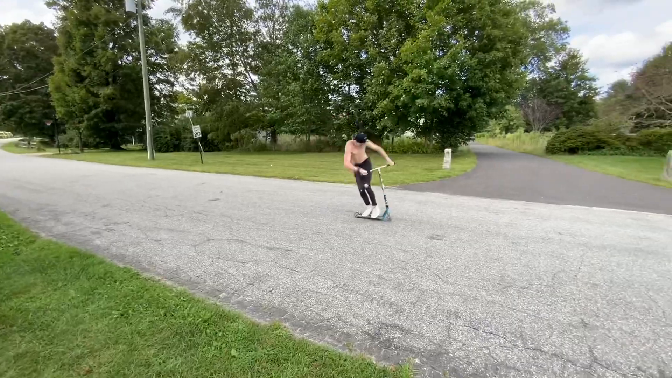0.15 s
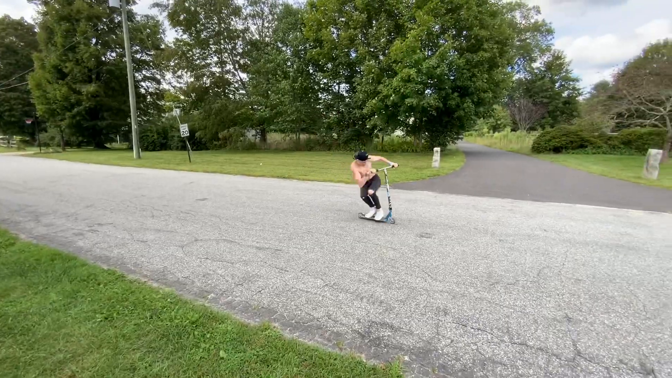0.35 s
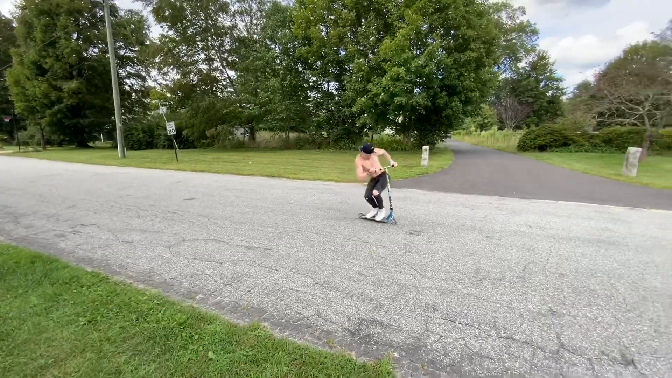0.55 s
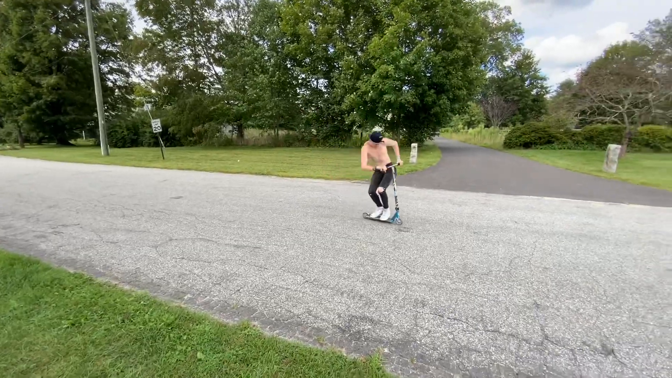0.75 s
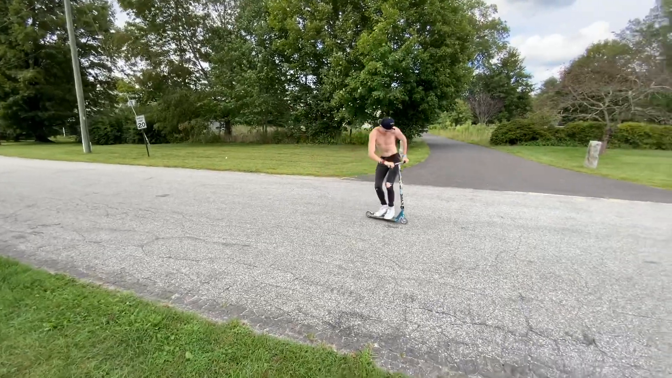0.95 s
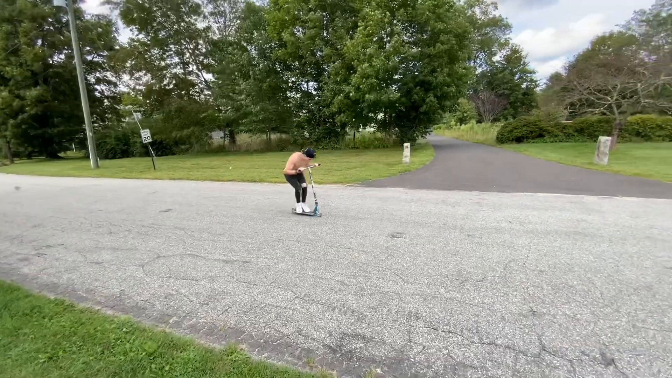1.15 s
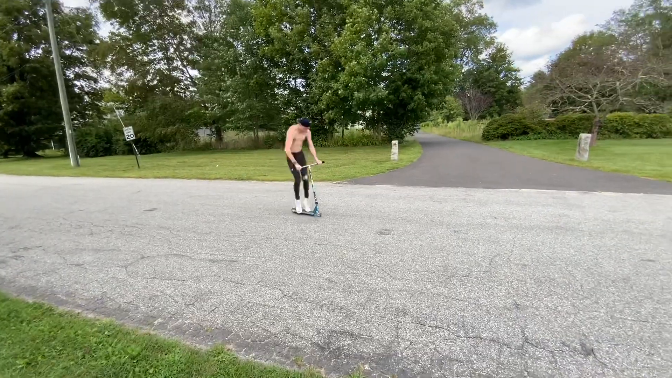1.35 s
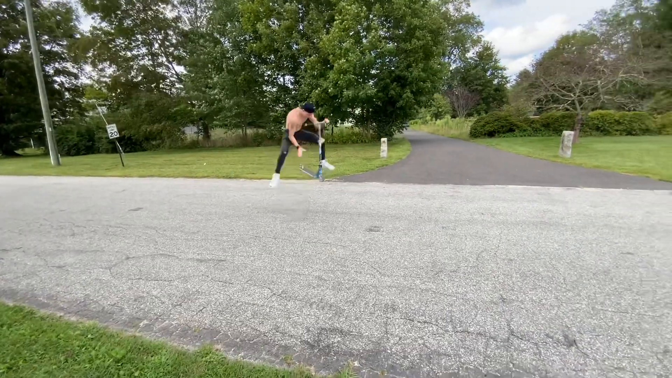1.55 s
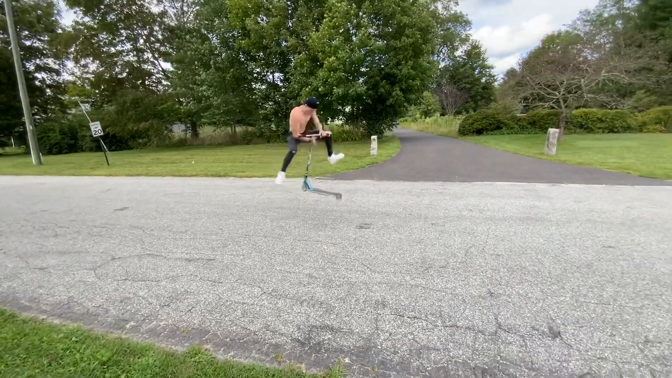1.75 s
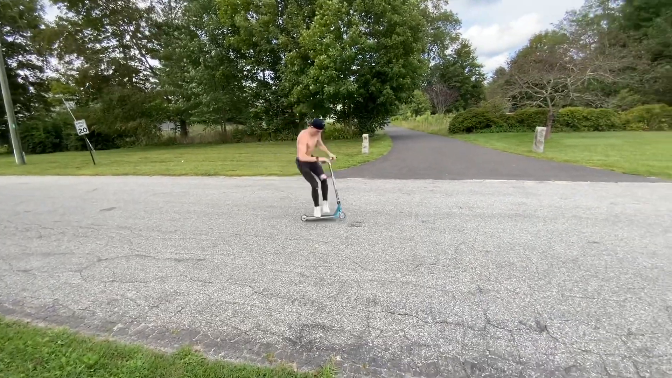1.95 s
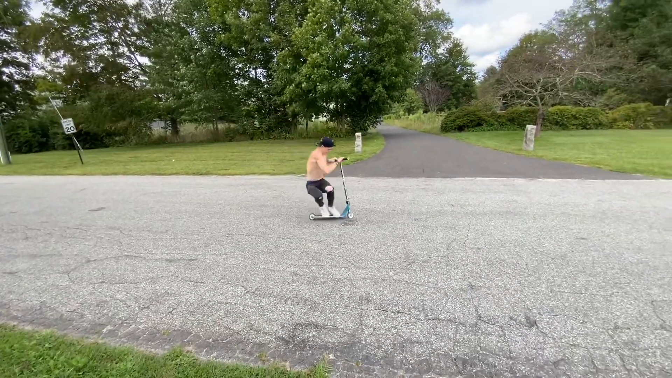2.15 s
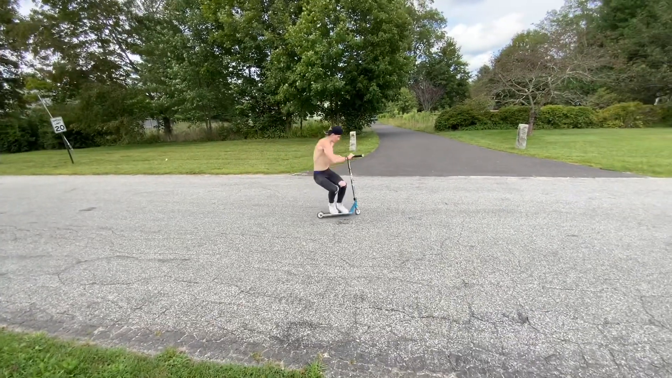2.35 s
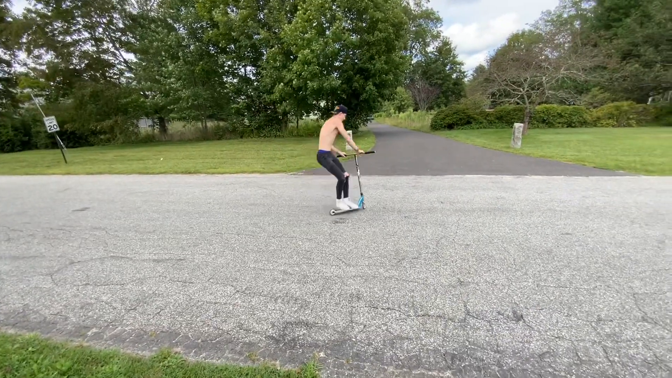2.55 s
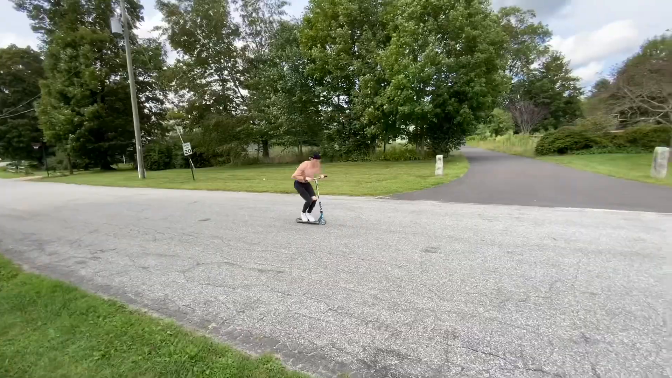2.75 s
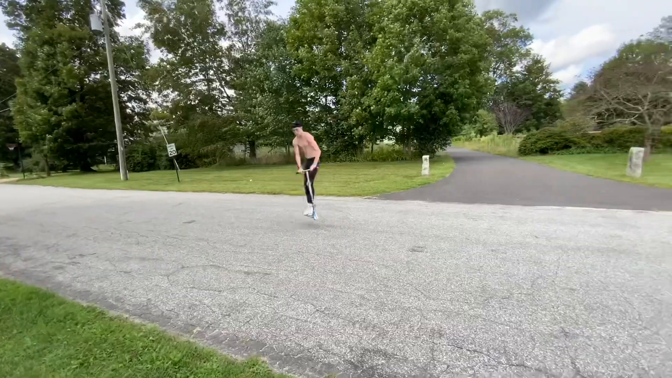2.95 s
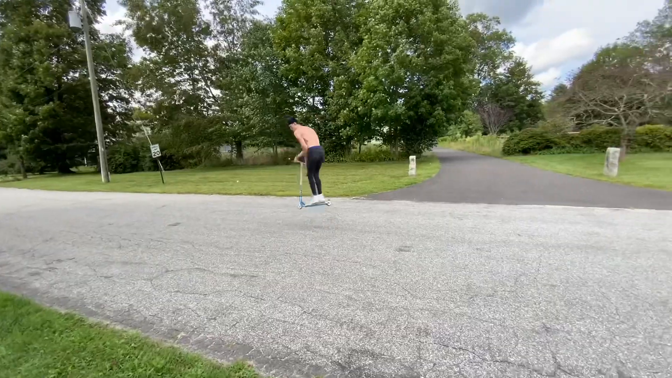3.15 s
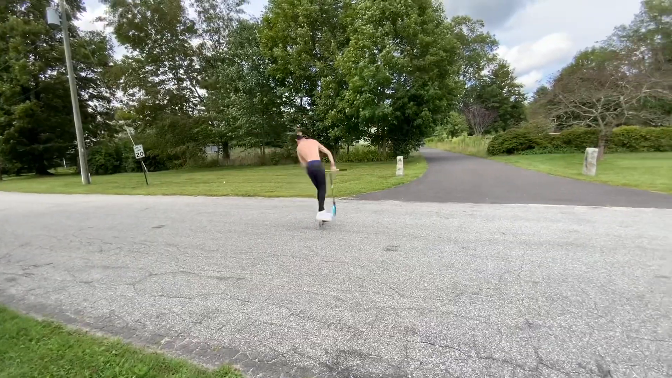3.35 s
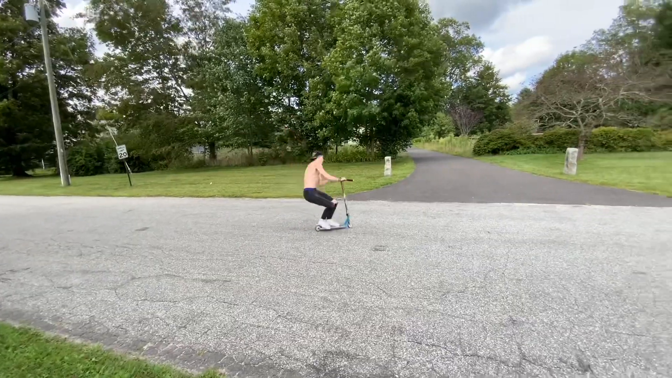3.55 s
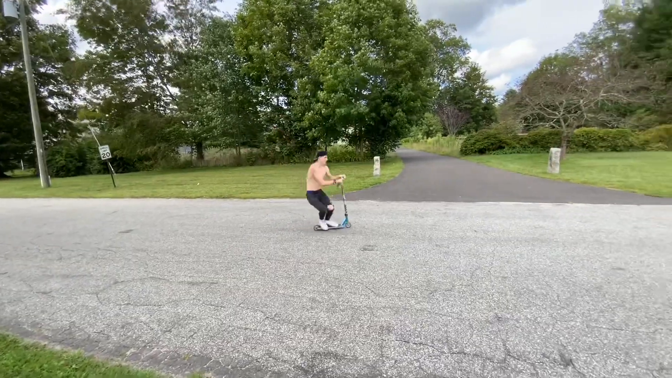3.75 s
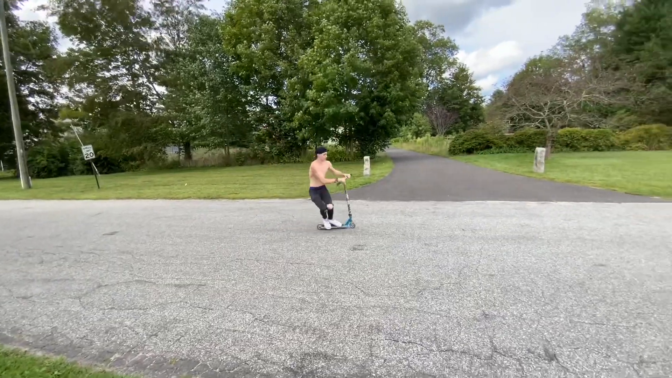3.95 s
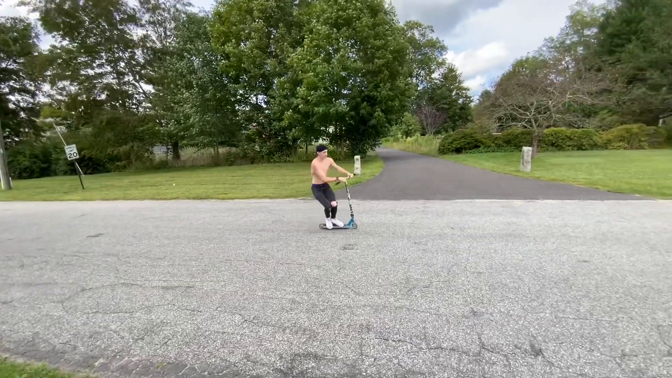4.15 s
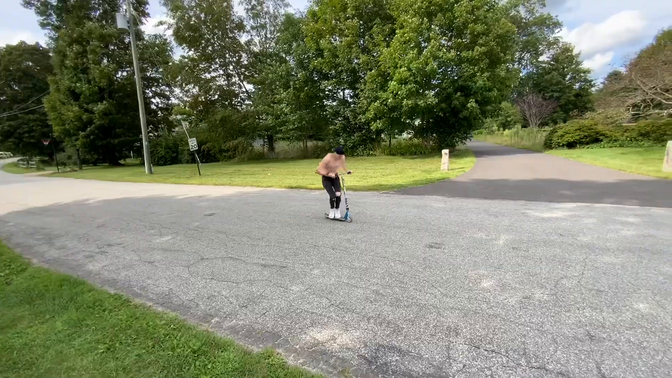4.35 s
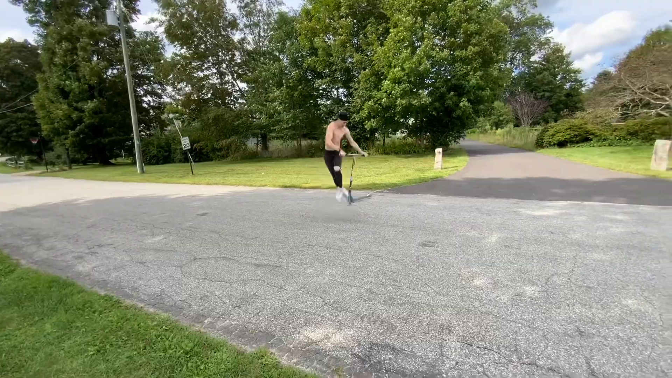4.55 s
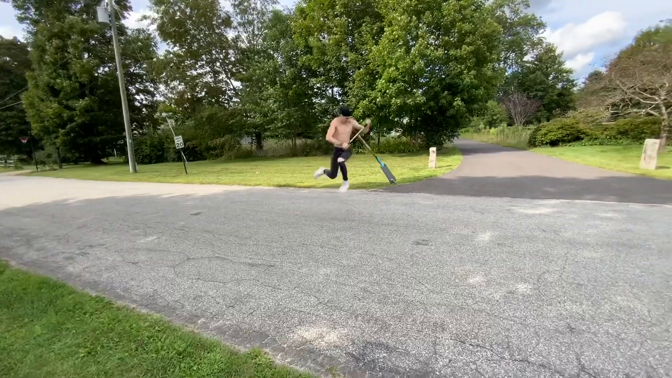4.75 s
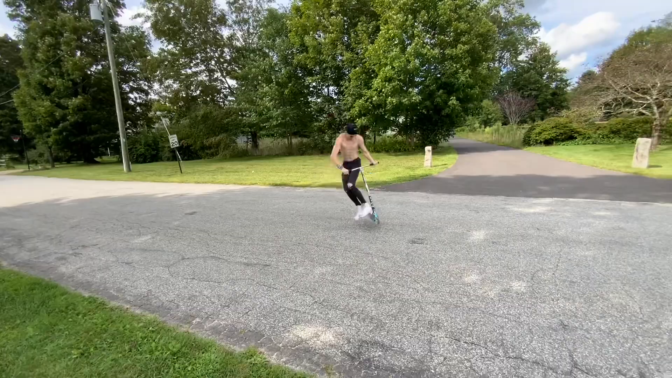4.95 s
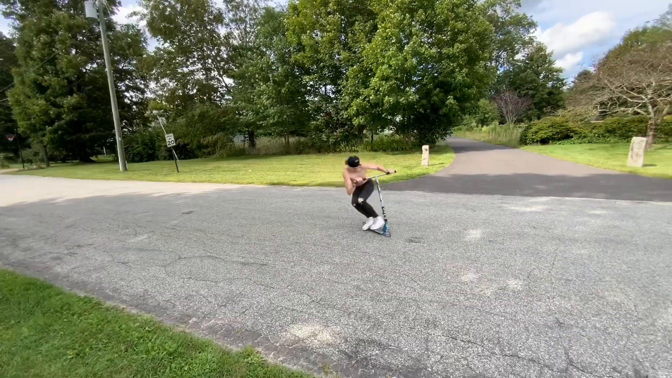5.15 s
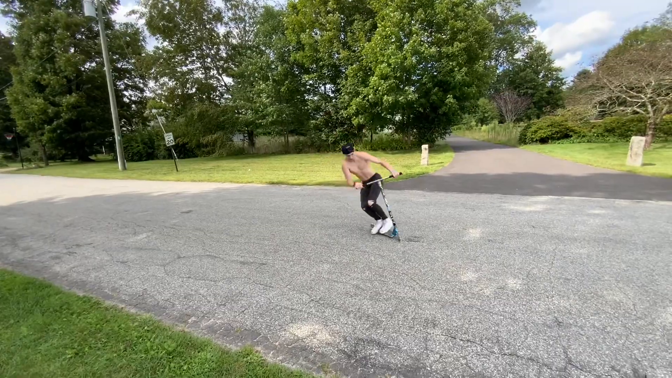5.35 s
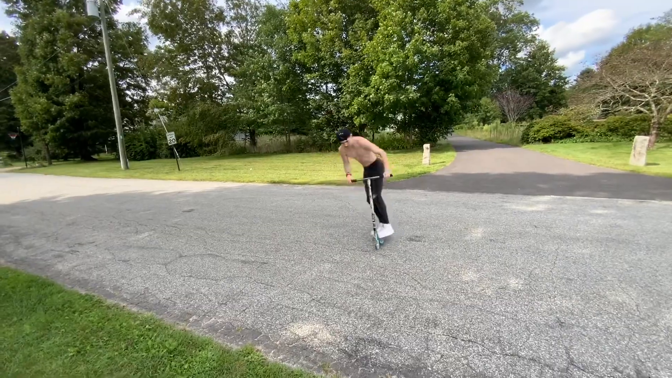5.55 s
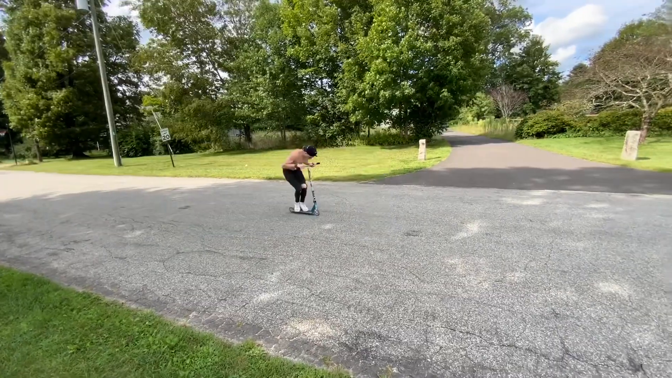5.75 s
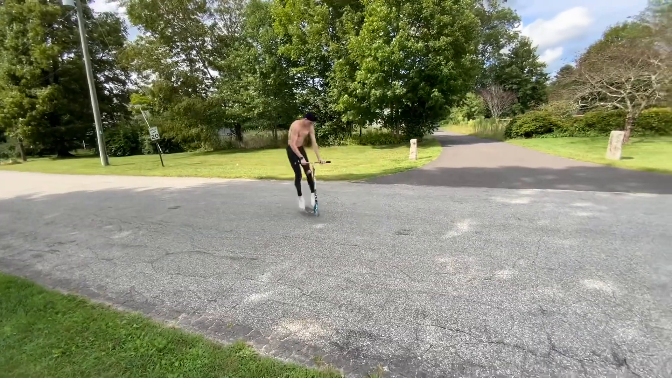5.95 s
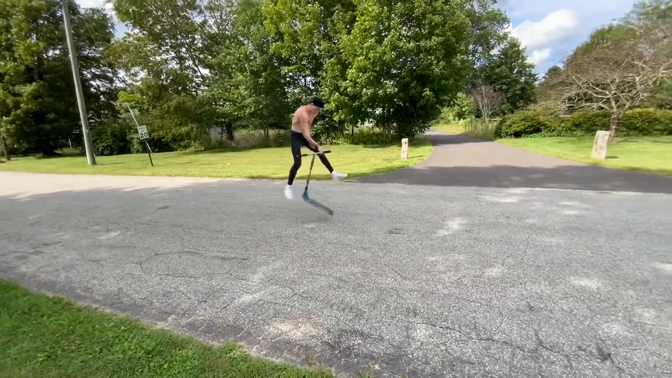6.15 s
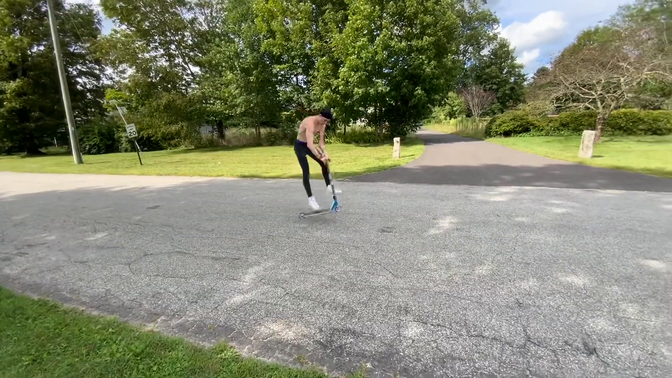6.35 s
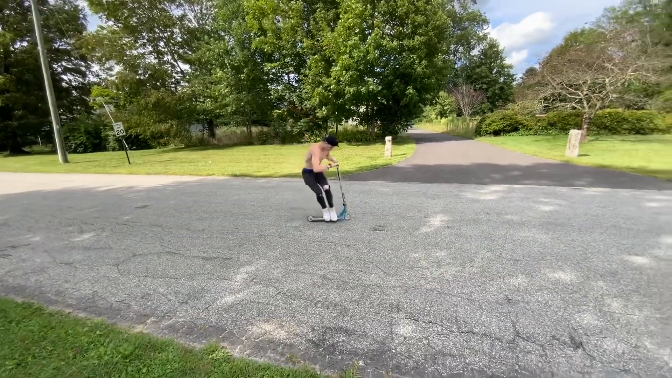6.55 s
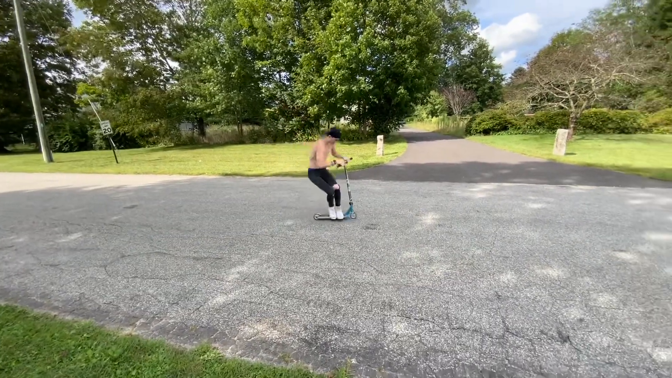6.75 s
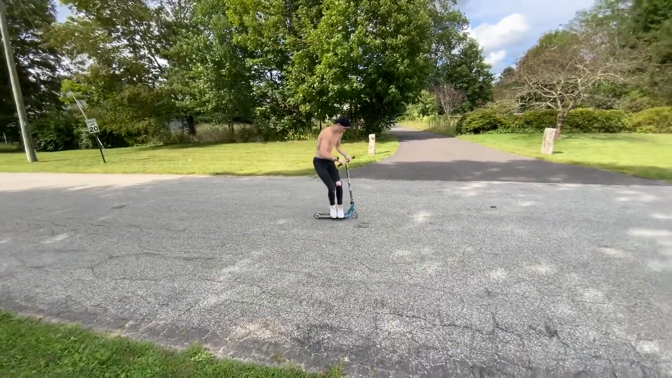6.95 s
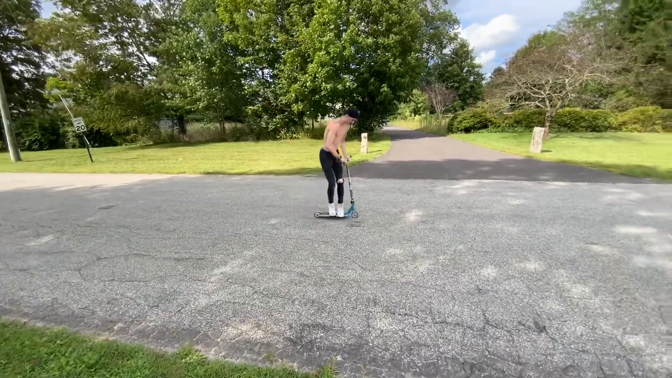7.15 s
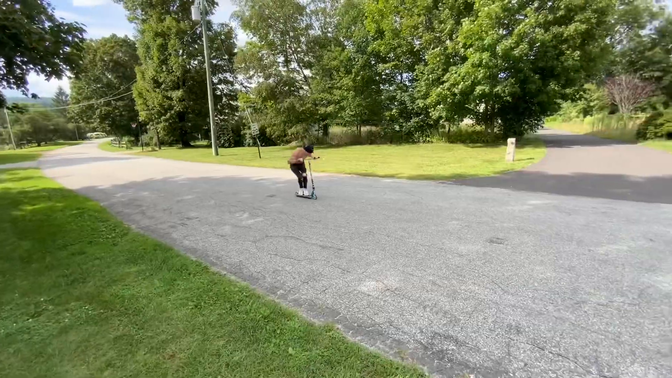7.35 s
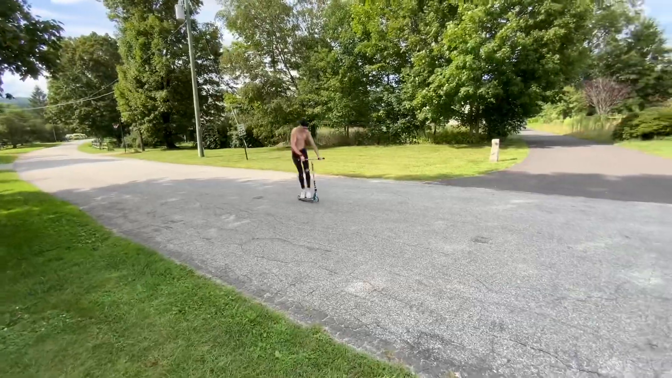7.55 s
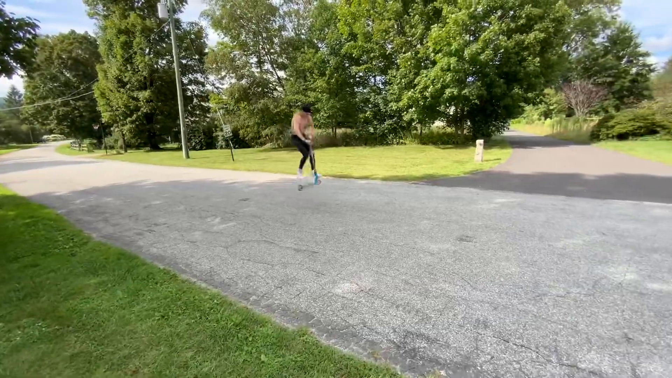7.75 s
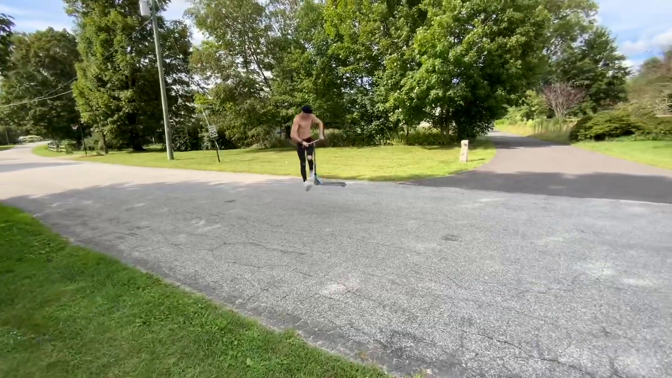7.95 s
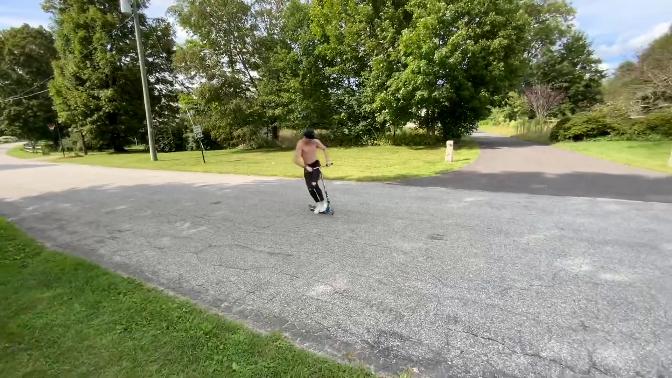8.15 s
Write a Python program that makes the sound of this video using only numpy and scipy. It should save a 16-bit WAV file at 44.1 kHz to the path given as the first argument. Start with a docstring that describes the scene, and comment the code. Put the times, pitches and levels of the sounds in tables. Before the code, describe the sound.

A kick scooter clacks, rattles and lands hard on rough asphalt outdoors, with wheel hiss and low wind buffets thumping the microphone.

```python
"""Close by a rough asphalt road: a kick scooter does tricks a few metres from a two-port microphone.
Leaves and insects hiss behind and wheel hiss runs from the start; the deck clacks from 0.14 s and rattle
follows, with hard blows near 2 s. Wind buffets the ports from the start, hardest near 3.8 s; blows near
3.4, 5 and 6.5 s stand out and a last pair comes at 8.2 s. Noise through resonances makes the blows and
rattle, shaped noise the hiss, swept sines the buffets; the level dips briefly five times."""
import sys
import numpy as np
from scipy import signal
from scipy.fft import rfft, irfft, next_fast_len
from scipy.io import wavfile
from scipy.ndimage import uniform_filter1d

SR = 44100
rng = np.random.default_rng(int(sys.argv[2]) if len(sys.argv) > 2 else 0)


def wrap_up_sound(samples):
    """Save the sound to the file named by the first command line argument, as 16-bit audio."""
    columns = np.atleast_2d(samples).T
    # keep every value between -1 and 1, then stretch to whole-number steps
    tamed = np.clip(columns, -1, 1)
    steps = np.round(tamed * 32767).astype(np.int16)
    wavfile.write(sys.argv[1], SR, steps)


N = 361619
T = np.arange(N) / SR

# Leaves behind the road. Each row: frequency in Hz, level in dB.
LEAF_COLOUR = [(100, 15.5), (400, 0), (1000, -1.5), (2500, -0.5), (4000, -1), (6500, -1.5), (9000, -3),
               (12000, -5.5), (16000, -16)]
# Bands in which the insects sing. Each row: centre in Hz, width in Hz, level in dB.
INSECT_BANDS = [(4920, 160, -38), (8510, 540, -26.5)]
# The background over time. Each row: time in seconds, leaves in dB, insects in dB.
BACKGROUND_LEVELS = [(0, -58, -25), (1.0, -52.5, -27), (1.05, -49.5, -27), (2.7, -48, -30.5),
                     (2.75, -44, -32), (4.3, -45, -27.5), (4.36, -46, -28), (5.7, -43, -33),
                     (5.75, -46, -26), (7.2, -48, -28.5), (7.25, -46.5, -35), (8.2, -52, -32)]
# Gusts on the microphone. Each row: start in seconds, length in seconds, rumble in dB, rasp in dB.
WIND_GUSTS = [(0, 0.21, -36, -41.5), (0.447, 0.082, -32, -66), (0.77, 0.077, -45.5, -56),
              (1.16, 0.22, -31.5, -69), (1.426, 0.044, -33, -56), (1.55, 0.025, -24, -62),
              (1.717, 0.062, -26.5, -42), (1.931, 0.073, -28, -32.5), (2.335, 0.18, -33, -51),
              (2.745, 0.018, -42, -46), (2.871, 0.017, -32, -31.5), (3.138, 0.039, -31.5, -31),
              (3.316, 0.067, -28.5, -27.5), (3.606, 0.24, -40, -27), (3.697, 0.011, -27, -43),
              (3.966, 0.078, -30.5, -22), (4.121, 0.11, -29, -30.5), (4.477, 0.08, -43, -56),
              (5.01, 0.024, -35, -59), (5.592, 0.13, -38.5, -40.5), (5.811, 0.1, -23.5, -31),
              (5.99, 0.21, -30, -38.5), (6.25, 0.11, -27, -36), (6.494, 0.04, -30.5, -33.5),
              (6.619, .22, -34, -43.5), (6.972, 0.099, -35, -41), (7.309, 0.18, -35.5, -60),
              (7.549, 0.13, -38.5, -57), (8.177, .03, -39, -37)]
# Single buffets of wind. Each row: start in seconds, level in dB, middle pitch in Hz, length in cycles.
WIND_BUFFETS = [(0.042, -24, 159, 7.6), (0.46, -25.5, 155, 4.6), (0.512, -31, 170, 3),
                (0.542, -22, 117, 3.96), (1.143, -12, 106, 4.7), (1.187, -14.5, 200, 4.2),
                (1.205, -18, 160, 2.4), (1.246, -20, 213, 7.3), (1.485, -12.5, 166, 4),
                (1.506, -14.5, 101, 2.8), (1.539, -19.5, 132, 3.2), (1.579, -23, 161, 1.8),
                (1.617, -10.5, 132, 3.86), (1.746, -25, 143, 3.4), (1.826, -28.5, 132, 3.6),
                (1.857, -23.5, 129, 3.4), (2.853, -31, 145, 5.5), (2.881, -27, 269, 3.7),
                (3.102, -17, 250, 3.6), (3.12, -22, 273, 5.2), (3.154, -17.5, 228, 1.9),
                (3.319, -24, 304, 4.5), (3.347, -22, 270, 5.2), (3.384, -10.5, 127, 0.71),
                (3.597, -16, 286, 5), (3.625, -16, 242, 6.1), (3.672, -17.5, 296, 4.6),
                (3.724, -15, 275, 2.7), (3.732, -14, 303, 2), (3.771, -12.5, 514, 6.1),
                (3.777, -4, 182, 3.3), (3.94, -31, 394, 3.6), (3.956, -20.5, 510, 1.8),
                (3.963, -16, 284, 3), (3.995, -13.5, 340, 5), (4.043, -25.5, 219, 1.9),
                (4.06, -44, 400, 5.1), (4.123, -30, 170, 1.9), (4.155, -26, 463, 4.2),
                (4.169, -15, 247, 5.7), (4.194, -17, 300, 2.4), (4.211, -24, 298, 1.7),
                (4.236, -21.5, 207, 3.1), (4.542, -27.5, 151, 2.56), (5.377, -30, 188, 8),
                (5.618, -25, 190, 3.5), (5.807, -13, 95.7, 3.36), (5.857, -15.5, 162, 4),
                (6.071, -19.5, 162, 4.1), (6.245, -35, 596, 6.6), (6.286, -26, 776, 6.6),
                (6.301, -19.5, 353, 5.6), (6.312, -17.5, 277, 4), (6.349, -24, 165, 2.5),
                (6.53, -31, 126, 2.6), (6.651, -24, 250, 5.3), (6.822, -16.5, 201, 4),
                (6.999, -20, 207, 2.95), (7.343, -25.5, 85.5, 0.87), (7.457, -19.5, 148, 3.1)]
# Slow lumps of wind pressure. Each row: frequency in Hz, level in dB.
RUMBLE_COLOUR = [(25, -70), (45, 6.5), (80, 8.5), (150, 2.5), (230, -9.5), (400, -104.5)]
# Sharp lumps of wind pressure. Each row: frequency in Hz, level in dB.
RASP_COLOUR = [(100, -39), (200, 12.5), (300, 5.5), (500, -6.5), (800, -13.5), (1400, -26.5), (2500, -99)]
# Brief tones, some pure, some fuzzy. Each row: start in seconds, length in seconds, pitch in Hz,
# fuzz in Hz, level in dB, change of level by the end in dB.
BRIEF_TONES = [(.36, 0.28, 3010, 2.4, -37, -28.5), (1.43, 0.21, 3010, 7.1, -42, -9),
               (2.06, 0.14, 181.7, 7.6, -36.5, -6), (1.995, 0.096, 5960, 30, -34, -8),
               (2.24, 0.12, 5850, 12, -51, 1), (2.75, 0.36, 7300, 290, -43, 1),
               (2.86, 0.23, 7360, 300, -42, -2), (4.955, .009, 3750, 30, -28, -6),
               (5.358, 0.067, 7640, 18, -36, -8), (5.666, 0.051, 3020, 4.5, -29, -24),
               (6.03, 0.03, 2440, 32, -27, -3), (6.57, 0.27, 3020, 9, -47, -14),
               (7.06, 0.17, 264, 36, -37.5, 3), (7.622, 0.11, 2900, 65, -41, -7),
               (7.87, 0.13, 380, 9.6, -37, -17)]
# Hiss of the wheels on the grit. Each row: time in seconds, level in dB.
ROLL_LEVELS = [(0.0, -56), (1.16, -56), (1.44, -57), (4.98, -57), (5.14, -53.5), (5.8, -56.5), (6.53, -57),
               (6.94, -62), (7.58, -56), (8.2, -79)]
# Stretches where stones rattle the deck. Each row: start in seconds, end in seconds, level in dB,
# low modes in dB, favoured low pitch in Hz, favoured high pitch in Hz.
RATTLE_STRETCHES = [(0.226, 0.483, -50.5, 0.5, 1250.0, 4540), (0.56, 0.727, -57, 3, 1250, 4590.0),
                    (0.695, 0.988, -54.5, 0.5, 1174, 4500), (1.042, 1.147, -45.5, -4, 1170, 4760),
                    (1.295, 1.476, -44, -1.5, 1246, 4970), (1.957, 2.283, -43.5, 1.5, 1193, 5170),
                    (2.386, 2.676, -49, -0.5, 1870, 4320), (2.735, 2.937, -59, 7.5, 1850, 4980.0),
                    (2.92, 2.997, -39, -7.5, 1810, 5800), (3.015, 3.148, -42, -3, 1436, 5880),
                    (3.46, 3.72, -48, -20, 900.0, 3910), (4.428, 4.478, -43.5, 6, 1254, 5500),
                    (5.03, 5.226, -45, -2, 1150, 5730), (5.307, 5.44, -45, -7, 1090.0, 5300),
                    (5.377, 5.706, -61.5, 13, 1190, 5260), (5.873, 6.066, -42, -1.5, 1170, 5430),
                    (6.226, 6.387, -44, -1, 920.0, 5410), (6.503, 6.805, -42.5, -2.5, 1173, 4820),
                    (7.22, 7.393, -41, -9, 1220, 5330), (7.32, 7.517, -53, -7, 1770, 5390.0),
                    (7.496, 7.624, -41, -3.5, 1730.0, 5320.0), (7.594, 7.76, -44, -16, 1530, 4450)]
# Clacks of deck, wheels and shoes. Each row: start in seconds, level in dB, knock below 2 kHz in dB,
# sizzle above 10 kHz in dB, contact in seconds, t60 in seconds (at least 0.015 is used),
# favoured low pitch in Hz, favoured high pitch in Hz, extra ring there in dB.
CLACK_BLOWS = [(0.1392, -27, 6.5, -9, 0.011, 0.055, 1540, 5070, 3.3),
               (0.1582, -23.5, -7, -1, 0.005, 0.12, 1450, 5020.0, 7.8),
               (0.1755, -12.5, 0, -6.5, 0.004, 0.043, 693, 5100, 1.6),
               (0.1855, -28, 9.5, -1, 0.011, 0.18, 720, 4500, 6.7),
               (0.1995, -24, -0.5, -3.5, 0.001, 0.24, 1370, 4500, 3),
               (0.358, -45.5, 9.5, -14, 0.0063, 0.32, 1240, 4470, 3.6),
               (0.412, -67, 14, -15, 0.003, 0.075, 1250.0, 4600, 5.5),
               (0.579, -47.5, 5, -25, 0.0033, 0.071, 1310, 4530, 7.5),
               (0.904, -34.5, 4.5, -12, 0.0018, 0.021, 1190, 4500, 2.5),
               (1.1045, -38, 2.5, -18, 0.013, 0.066, 1230, 4700, 6.7),
               (1.3825, -27, 0, -5, 0.0036, 0.18, 1740.0, 3900, 2.4),
               (1.3952, -27.5, 0, -3, 0.012, 0.19, 1230, 4950, 6.9),
               (1.5612, -38.5, 2, -10, 0.0064, 0.28, 1730.0, 5650, 2.9),
               (1.5948, -36, 5.5, -19, 0.0092, 0.059, 2130.0, 5700, 2.5),
               (1.6215, -34, 1, -6, 0.0035, 0.036, 620, 6760, 2.5),
               (1.677, -28, -1.5, -5.5, 0.016, 0.075, 1340, 5820, 9.8),
               (1.9054, -43.5, 16.5, 5, 0.0066, 0.077, 690, 7500.0, 4),
               (1.9245, -26.5, 17.5, -20, 0.0025, 0.059, 326, 4600, 8.2),
               (1.9415, -17, 4.5, -8, 0.0058, 0.13, 453, 4860, 3.1),
               (1.957, -15.5, -7, -21, 0.014, 0.058, 643, 6200, 2.1),
               (1.9657, -30.5, -3, 16.5, 0.0017, 0.068, 2200.0, 5240.0, 4),
               (1.9915, -26, 3, -2.5, 0.018, 0.14, 840.0, 6900, 3),
               (2.029, -28.5, -2, -7, 0.0025, 0.1, 1230, 4200, 4),
               (2.204, -32, 1, -4, 0.013, 0.06, 1830, 5030, 2.6),
               (2.217, -32, -7, 1, 0.011, 0.019, 1210.0, 5400, 4),
               (2.3743, -34, -18, 1, 0.0018, 0.024, 1860.0, 4900, 3.2),
               (2.4478, -32, -6, -3.5, 0.0027, 0.071, 1780.0, 4370, 12),
               (2.6126, -35, 1, -4, 0.0038, 0.024, 1510, 4570, 7.3),
               (2.6759, -32.5, 4.5, -2, 0.0026, 0.064, 1480, 4300, 4.4),
               (2.9215, -29, 1.5, -2.5, 0.0036, 0.12, 1960, 4800, 5.8),
               (3.095, -35.5, 5, -16, 0.0019, 0.029, 760.0, 5870.0, 4.5),
               (3.1172, -43, 12.5, -17, 0.011, 0.11, 574, 5800, 4),
               (3.2406, -42, 12, 1, 0.0027, 0.015, 2180, 5700, 4),
               (3.263, -34.5, 12, -23, 0.011, 0.11, 710, 7300, 9.7),
               (3.2697, -23.5, -15, -1, 0.0044, 0.13, 1710, 5750, 2.5),
               (3.3487, -39.5, -15, -12, 0.0041, 0.13, 570.0, 7700, 6.6),
               (3.4285, -16, 3.5, 5, 0.018, 0.014, 1660, 5930, 4.6),
               (3.552, -46, 9, -15, 0.0034, 0.043, 640.0, 5180.0, 4.6),
               (3.6653, -42.5, 11, -23, 0.0053, 0.21, 560.0, 3740.0, 3.5),
               (4.093, -56, 16, -21, 0.003, 0.033, 1240.0, 7420.0, 4),
               (4.4702, -31.5, -12, -1, 0.0011, 0.06, 1150.0, 5170, 11),
               (4.6972, -43, 4, -7, 0.0044, 0.043, 1480, 4150, 4.4),
               (4.807, -45, 0.5, -11, 0.0036, 0.053, 656, 6660, 4),
               (4.933, -39, 9.5, -4, 0.0053, 0.1, 1000, 3300, 6.4),
               (4.9973, -15.5, 5.5, -3.5, 0.013, 0.018, 1230, 5600, 7.9),
               (5.021, -26.5, 4, -2, 0.0024, 0.14, 593, 7900, 4.3),
               (5.043, -25.5, -0.5, -2, 0.0033, 0.2, 1070, 5750, 3.7),
               (5.0609, -33.5, -3, 1, 0.0036, 0.074, 1140.0, 7720.0, 4),
               (5.2248, -29.5, -2, -6.5, 0.0034, 0.093, 562, 5200, 8.9),
               (5.3448, -37.5, 4.5, -12, 0.003, 0.12, 1080, 4860, 4),
               (5.546, -35, -5, -36, 0.0041, 0.038, 1730.0, 3600, 3),
               (5.644, -29.5, 2.5, -5.5, 0.013, 0.12, 1170, 5250, 1.7),
               (5.9412, -35.5, 8, -7, 0.0046, 0.056, 2200, 4090.0, 3),
               (5.9593, -25, -5, -2, 0.0035, 0.074, 1220.0, 5600, 4),
               (5.9825, -34.5, -21, -2, 0.019, 0.18, 1710.0, 6100, 4.9),
               (6.0267, -35, -19, -2, 0.013, 0.11, 1590.0, 7640, 5.9),
               (6.1899, -37, 1, -10, 0.0029, 0.057, 1740, 4240, 9.5),
               (6.2265, -42.5, 12, -5, 0.0022, 0.024, 1700, 4250, 10),
               (6.2636, -28.5, 0, -4, 0.011, 0.058, 1730, 4360, 1.1),
               (6.3303, -43, 4, -3, 0.025, 0.14, 560.0, 3950, 3.1),
               (6.446, -42, 18, -21, 0.017, 0.083, 660.0, 6910.0, 4),
               (6.4595, -17, 4.5, 4, 0.017, 0.082, 2100, 6500, 4.2),
               (6.487, -28, 13, 0, 0.0022, 0.055, 830, 6400, 3.3),
               (6.5096, -32, 1, 1, 0.0033, 0.082, 2010.0, 3750.0, 4),
               (6.5267, -31.5, 8.5, -3, 0.0051, 0.27, 2160, 4600, 3.6),
               (6.5734, -28, -3, 4, 0.0042, 0.16, 1770.0, 4900, 2.5),
               (6.989, -41, 1.5, -3, 0.0042, 0.041, 560.0, 5200, 2.7),
               (7.2419, -39.5, -9, -20, 0.0066, 0.098, 1220.0, 4070, 8),
               (7.265, -40, 4, -9, 0.004, 0.074, 1750, 4100, 9.4),
               (7.291, -43.5, 8, -14, 0.0066, 0.077, 1720.0, 4050.0, 8.8),
               (7.309, -41, 8, -22, 0.0069, 0.1, 1230, 4130, 5.1),
               (7.5456, -38.5, 6, -14, 0.0032, 0.038, 1690, 5300, 11),
               (7.5899, -30, 4.5, -2, 0.0066, 0.12, 1610, 4030, 6.5),
               (7.6017, -28.5, -4.5, -0.5, 0.01, 0.03, 1250, 5500, 9.3),
               (7.841, -22.5, 2.5, -1, 0.0046, 0.097, 1000, 4800, 5.3),
               (7.8666, -27, -12, -12, 0.0068, 0.043, 1880, 4330, 4),
               (7.8855, -30, -2.5, -1, 0.014, 0.13, 1720, 5600, 4.9),
               (8.1492, -21.5, -0.5, -7, 0.00099, 0.067, 830, 6240, 13.7),
               (8.1804, -16, 7, 2, 0.016, 0.077, 960, 5640, 6.4)]
# Modes of deck and bars. Each row: frequency in Hz, width in Hz, level in dB.
DECK_MODES = [(300, 99, -2.5), (632, 82, -1), (844, 40, -8), (1220, 50, -4.5), (1450, 77, -8),
              (1723, 79, -8), (3000, 19, -2), (3686, 50, -6), (4060, 143, -1.5), (4350, 78, -6.5),
              (4596, 91, -3), (4966, 64, -5), (5290, 25, -9.5), (5354, 200, -6.5), (5790, 51, -8.5),
              (6260, 300, -15.5), (6750, 59, -5.5), (7370, 59, -3), (14000, 46, -28)]
# Broad colour of a contact. Each row: frequency in Hz, level in dB.
CONTACT_COLOUR = [(150, 1.5), (500, -6), (1200, 0.5), (2500, -0.5), (4000, -6), (5500, -5), (7500, -7.5),
                  (10000, 5), (13000, -2), (16000, -13)]
# Share of the noise unlike at the two ports. Each row: frequency in Hz, level in dB.
UNLIKE_SHARE = [(300, 2.5), (1200, -9.5), (2500, 0), (5000, -7.5), (8000, 3.5), (9000, -39)]
# Phase between the ports. Each row: frequency in Hz, lead of the left port in radians.
PORT_PHASE = [(0, 0), (340, -0.4), (600, 0.9), (1120, 0.9), (1720, -1.0), (2410, -2.5), (3190, -5.3),
              (3880, -6.3), (6120, -7.1), (8700, -9.2), (11600, -9.8), (11900, -10.5), (13200, -12.5),
              (16300, -12.6)]
# Balance of the ports. Each row: frequency in Hz, left over right in dB.
PORT_TILT = [(200, 0), (600, 2), (1800, 1), (4000, -.5), (6400, -1.2), (10000, 0)]
# Bass roll-off of the microphone. Each row: frequency in Hz, level in dB.
MIC_BASS = [(15, -38), (30, -12), (50, 1), (80, -0.5)]
# Brief dips of the whole level. Each row: middle in seconds, half length in seconds, depth in dB.
LEVEL_DIPS = [(1.023, 0.024, 24), (2.724, 0.014, 24), (4.324, 0.03, 22), (5.727, 0.034, 22),
              (7.22, 0.024, 23)]

GUST_RISE_DB_PER_S, GUST_FALL_DB_PER_S = 320, 225  # for the rumble
RASP_QUICKER = 1.58  # the rasp comes and goes faster than the rumble by this factor
BREEZE_DB, BREEZE_RASP_DB = -49, -58.5  # between the gusts
PORT_LAG_RAD = 1.2  # the right port feels the eddies this much later
BOUNCES_PER_S, BOUNCE_S = 55, .007  # the wheels skip over the stones
RATTLE_RING_DB = 13  # how much the favoured modes stand out in the rattle
STRIKE_SPREAD_DB, CHATTER_DB = 2.5, 2.5  # unevenness of the struck modes, and of the loose parts
RISE_SHARE = 0.098  # time constant of a blow's build-up, as a share of the contact
# The thud under a clack, relative to it: at 0 dB, and its change per dB of the clack's level.
THUD_DB, THUD_PER_DB = 21.5, 1.0745
# The loaded deck thumps once, at a share of the favoured low pitch.
THUD_SHARE, THUD_TOP_HZ, THUD_T60_S, THUD_BODY_DB = 0.402, 470, 0.03, -9
KNOCK_SLOPE_DB, DECK_RING_DB = -6.5, 9
SPOT_SHARE = 0.086  # how far, as a share of its pitch, a struck spot favours the modes around it
EDGE_HZ = 16200  # upper limit of the band


def amp(db):
    """Gain of a level in dB."""
    return 10 ** (np.asarray(db) / 20)


def evened(x):
    """Scales to rms 1."""
    return x / np.sqrt(np.mean(x ** 2) + 1e-20)


def read(points, hz):
    """Reads a spectrum on a log-frequency axis."""
    f, value = np.transpose(points)
    return np.interp(np.log(hz + 1), np.log(f + 1), value)


def curves(rows):
    """One control per column, sample by sample."""
    s, *columns = np.transpose(rows)
    return [np.interp(T, s, c) for c in columns]


def colour(x, points):
    """Filters by a spectrum in dB."""
    size = next_fast_len(x.shape[-1])
    gain = amp(read(points, np.fft.rfftfreq(size, 1 / SR)))
    return irfft(rfft(x, size) * gain, size)[..., :x.shape[-1]]


def add(mix, s, sound):
    """Mixes a sound in at time s."""
    part = mix[..., max(round(s * SR), 0):][..., :sound.shape[-1]]
    part += sound[..., :part.shape[-1]]


def ring(x, hz, width):
    """A two-pole resonance, gain 1 at its peak."""
    return signal.lfilter(*signal.iirpeak(hz, hz / width, SR), x)


def grit(shape, per_s, spread_db):
    """Sparse clicks of uneven size."""
    size = amp(spread_db * np.minimum(rng.exponential(1, shape), 4))
    return size * rng.standard_normal(shape) * (rng.random(shape) < per_s / SR)


def smear(clicks, seconds):
    """Turns each click into a push that dies away exponentially."""
    return signal.lfilter([1], [1, -np.exp(-1 / (seconds * SR))], abs(clicks))


def wander(per_s):
    """Noise of rms 1, smoothed twice over 1 / per_s seconds."""
    span = max(int(SR / per_s), 1)
    return evened(uniform_filter1d(uniform_filter1d(rng.standard_normal(N), span), span))


def two_ports(shape):
    """Noise with a part shared by both ports and a part of each port's own."""
    return rng.standard_normal((1, *shape)) + colour(rng.standard_normal((2, *shape)), UNLIKE_SHARE)


def leaves(level_db):
    """Leaves hiss smoothly as broad noise; the lower rustle comes in patches."""
    hiss = evened(colour(two_ports((N,)), LEAF_COLOUR))
    rustle = colour(hiss, [(3000, 2), (4500, -33)])
    hiss = hiss + rustle * (amp(2.5 * wander(per_s=14)) - 1)
    return amp(level_db + 0.09 * wander(per_s=0.91) + 0.4 * wander(per_s=120)) * hiss


def insects(level_db):
    """Insects sing in two bands of twice-resonated noise with a trembling level."""
    song = np.zeros(N)
    for hz, width, db in INSECT_BANDS:
        band = ring(ring(rng.standard_normal(N), hz, width), hz, width)
        song += amp(db) * evened(band)
    return amp(level_db + 4.1 * wander(per_s=50)) * song


def background():
    """Leaves and insects behind the road, each following its own level."""
    leaves_db, insects_db = curves(BACKGROUND_LEVELS)
    return leaves(leaves_db) + insects(insects_db)


def gusts():
    """Gain of rumble and rasp: each gust rises, holds and falls over a light breeze."""
    power = np.ones((2, N)) * amp([[BREEZE_DB], [BREEZE_RASP_DB]]) ** 2
    for start, length, rumble_db, rasp_db in WIND_GUSTS:
        before_db = GUST_RISE_DB_PER_S * np.maximum(start - T, 0)
        after_db = GUST_FALL_DB_PER_S * np.maximum(T - start - length, 0)
        fade = amp(-(before_db + after_db) * np.array([[1], [RASP_QUICKER]]))
        power = power + (amp([[rumble_db], [rasp_db]]) * fade) ** 2
    return np.sqrt(power)


def buffets(rough):
    """Each buffet is a swept sine that falls in pitch as the eddy passes, with a rough front."""
    out = np.zeros((2, N))
    lurch = .12 * wander(per_s=160)  # the eddies turn unevenly (cycles)
    for s, db, hz, cycles in WIND_BUFFETS:
        u = np.arange(0, 2.5, hz / cycles / SR)  # time in buffet lengths
        first = round(s * SR)
        sweep = 0.786 * u + 0.27 * (1 - np.exp(-u / 0.28)) + 0.24 * (1 - np.exp(-u / 0.076))
        turns = cycles * sweep + rng.random() + lurch[first:][:len(u)]
        ragged = rough[:, first:][:, :len(u)] * np.exp(-u / 0.31)
        swell = (u / 0.4) ** 1.16 * np.exp(1.2 - u / 0.34 - (u / 0.85) ** 3)
        add(out, s + 0.001944, amp(db) * swell * (np.sin(2 * np.pi * turns) + 0.64 * ragged))
    return out


def wind():
    """Lumpy air pressure right at the ports: rumble, fluttering rasp and single buffets."""
    rumble, rasp = gusts()
    shared, own = rng.standard_normal((2, 1, N)), rng.standard_normal((2, 2, N))
    slow, sharp = shared + 0.65 * own
    slow, sharp = evened(colour(slow, RUMBLE_COLOUR)), evened(colour(sharp, RASP_COLOUR))
    rough = evened(colour(sharp, [(250, 2.5), (600, 6.5), (1200, -0.5), (2000, -8)]))
    out = rumble * amp(2.3 * wander(per_s=170)) * slow
    flaps = uniform_filter1d(smear(grit(N, per_s=76, spread_db=0.0), 0.0062), size=60)
    flutter = evened(0.5 + np.minimum(flaps, 2))
    out += rasp * amp(2.4 * wander(per_s=27)) * flutter * sharp
    out += buffets(rough)
    late = signal.hilbert(out[1], next_fast_len(N))[:N] * np.exp(-1j * PORT_LAG_RAD)
    return np.array([out[0], late.real])


def trees(x):
    """Scattered echoes from the road and the tree line, the treble lasting longer."""
    t = np.arange(SR // 2) / SR
    taps = grit(len(t), per_s=3700, spread_db=2.0) * (t > .008)
    dull = colour(taps, [(1500, -1.0), (4000, -44)])
    tail = dull * amp(-60 * t / .5) + (taps - dull) * amp(-60 * t / 0.67)
    return signal.fftconvolve(x, tail / np.linalg.norm(tail))[:N]


def tones():
    """Brief sines of wandering phase through a resonance; one waver of strength serves them all."""
    out, waver = np.zeros(N), amp(2.5 * wander(per_s=45) - 1.5)
    for s, length, hz, fuzz, db, fade_db in BRIEF_TONES:
        t = np.arange(0, length, 1 / SR)
        drift = np.cumsum(rng.standard_normal(len(t))) * np.sqrt(2 * np.pi * fuzz / SR)
        fuzzy = ring(np.sin(2 * np.pi * hz * t + drift), hz, 2 * fuzz + 20)
        add(out, s, fuzzy * signal.windows.tukey(len(t), .35) * amp(db + fade_db * t / length))
    return out * waver


def roll():
    """Hard wheels hiss and tick over the stones: clicks and noise in the colour of a contact."""
    stones = evened(grit(N, per_s=1600, spread_db=14.5)) + 1.64 * two_ports((N,))
    contact = colour(stones, CONTACT_COLOUR)
    hiss = evened(colour(contact, [(400, -28), (900, -12), (7000, -16.5), (10000, -48.0)]))
    return amp(curves(ROLL_LEVELS)[0] + 2.0 * wander(per_s=260)) * hiss


def rattle():
    """Stones knock the wheels in uneven clumps and shake deck modes that swell and fade."""
    stones = evened(grit(N, per_s=1700, spread_db=0.0)) + 0.5 * rng.standard_normal(N)
    skips = smear(grit(N, per_s=BOUNCES_PER_S, spread_db=1.5), BOUNCE_S)
    stones = stones * (.45 + np.minimum(skips, 3))
    modes = []
    for mode_hz, width, db in DECK_MODES:
        swell = amp(db + 3.5 * np.clip(wander(per_s=40.0), -2, 1.5))
        modes.append(swell * np.sqrt(60 / width) * ring(stones, mode_hz, width))
    modes, hz = np.array(modes), np.array(DECK_MODES)[:, 0]
    is_low, is_high = (500 < hz) & (hz < 2000), hz > 2000
    knock = 0.43 * evened(colour(stones, [(400, -39), (800, -7), (2200, 6.5), (3000, -29)]))
    crunch_colour = [(2200, -31), (3200, 15), (6000, -18), (9000, -21), (14000, -17)]
    crunch = 0.14 * evened(colour(stones, crunch_colour))
    out = np.zeros(N)
    for start, end, db, low_db, low_hz, high_hz in RATTLE_STRETCHES:
        span = slice(round(start * SR), round(end * SR))
        # the stance favours some modes
        nearness = sum(np.exp(-(np.log(hz / spot) / 0.03) ** 2) for spot in (low_hz, high_hz))
        favoured = amp(RATTLE_RING_DB * nearness)
        low = evened(favoured * is_low @ modes[:, span]) + knock[span]
        high = evened(favoured * is_high @ modes[:, span]) + crunch[span]
        fade = amp(-5.0 * (T[span] - start) / (end - start))
        shape = signal.windows.tukey(len(low), .5) * fade
        add(out, start, amp(db) * (high + amp(low_db) * low) * shape)
    return out


def near(hz, spots, ring_db):
    """Extra ring of the frequencies close to the pitches of the struck spot."""
    return amp(ring_db) * sum(np.exp(-(np.log((hz + 1) / spot) / SPOT_SHARE) ** 2) for spot in spots)


def clacks():
    """Each contact clatters while the parts scrape, then dies; it rings the deck where it strikes."""
    out, t = np.zeros((2, N)), np.arange(8192) / SR
    hz, mode_hz = np.fft.rfftfreq(len(t), 1 / SR), np.array(DECK_MODES)[:, 0]
    modes = np.array([amp(db) * signal.freqz(*signal.iirpeak(f, f / width, SR), hz, fs=SR)[1]
                      for f, width, db in DECK_MODES])
    uneven = np.clip(rng.standard_normal((len(CLACK_BLOWS), len(DECK_MODES))), -2, 2)
    struck = amp(STRIKE_SPREAD_DB * uneven)
    lumps = uniform_filter1d(rng.standard_normal((len(CLACK_BLOWS), len(t))), 90, axis=1)
    crunch = two_ports(lumps.shape) * amp(CHATTER_DB * evened(lumps))  # loose parts chatter
    for k, row in enumerate(CLACK_BLOWS):
        s, db, knock_db, sizzle_db, contact, t60, low_hz, high_hz, ring_db = row
        spots = (low_hz, high_hz)
        rise = 1 - np.exp(-t / (RISE_SHARE * contact))
        fall = rise * amp(-60 * np.maximum(t - contact, 0) / max(t60, .015))
        fall = fall * (1 + 0.68 * np.exp(-t / 0.0037))  # the first touch snaps
        thud_db = THUD_DB + THUD_PER_DB * db
        tilt = [(100, -5.5), (220, thud_db), (400, thud_db), (800, knock_db),
                (1800, knock_db + KNOCK_SLOPE_DB), (2800, 1.0), (7500, 2.5), (11000, sizzle_db)]
        scrape = colour(evened(colour(crunch[:, k], CONTACT_COLOUR)), tilt)
        strength = np.sqrt(np.mean(scrape ** 2) * np.mean(fall ** 2))
        blow = amp(db) * evened(scrape * fall) * strength
        thump = np.sin(2 * np.pi * min(THUD_SHARE * low_hz, THUD_TOP_HZ) * t) * amp(-60 * t / THUD_T60_S)
        blow = blow + amp(db + thud_db + THUD_BODY_DB) * thump
        favoured = struck[k] * (0.67 + near(mode_hz, spots, ring_db))
        body = 1 + 0.69 * near(hz, spots, ring_db) + amp(DECK_RING_DB) * (favoured @ modes)
        add(out, s, irfft(rfft(blow) * body))
    return out


def ports(x):
    """Turns the two channels apart in phase by frequency and tilts their balance."""
    size = next_fast_len(N)
    hz = np.fft.rfftfreq(size, 1 / SR)
    half_turn = np.exp(.5j * np.interp(hz, *np.transpose(PORT_PHASE)))
    half = amp(read(PORT_TILT, hz) / 2) * half_turn
    return irfft(rfft(x, size) * np.array([half, 1 / half]), size)[:, :N]


def scene():
    """Scooter and surroundings reach both ports; wind acts on them directly."""
    hits = clacks()
    echoes = amp(-19.0) * trees(hits.mean(axis=0))
    scooter = hits + roll() + rattle() + tones() + echoes
    return ports(scooter + background()) + wind()


def record(dry):
    """Microphone bass roll-off, soft overload, brief dips of level, then the band limit."""
    limited = .95 * np.tanh(colour(dry, MIC_BASS) / .95)
    dip_db = sum(db * np.maximum(1 - abs(T - s) / half, 0) ** 2 for s, half, db in LEVEL_DIPS)
    band = signal.firwin(255, EDGE_HZ, window=("kaiser", 9), fs=SR)
    return signal.oaconvolve(limited * amp(-dip_db), band[None], "same")


dry = scene()
out = record(dry)
wrap_up_sound(out)
```